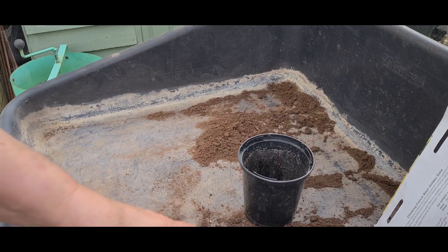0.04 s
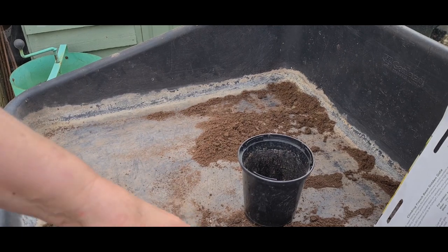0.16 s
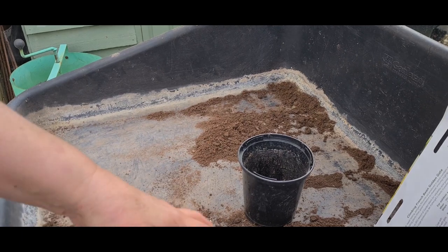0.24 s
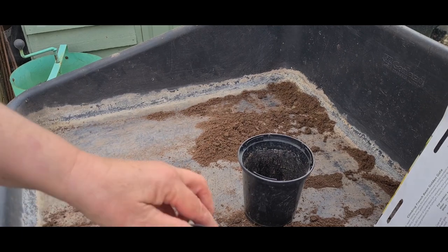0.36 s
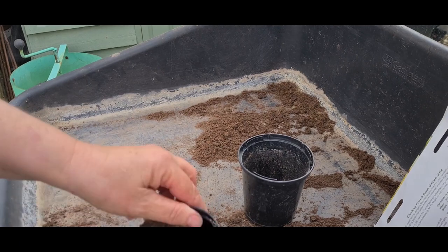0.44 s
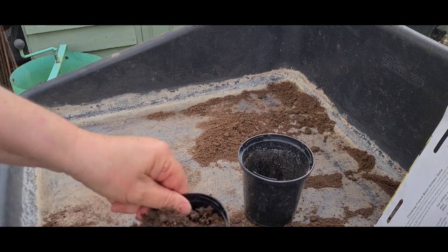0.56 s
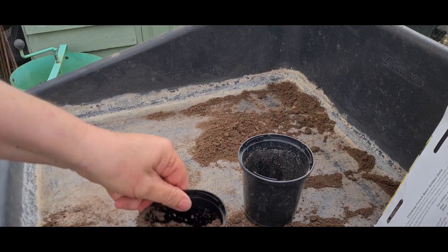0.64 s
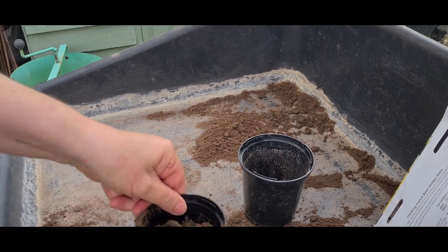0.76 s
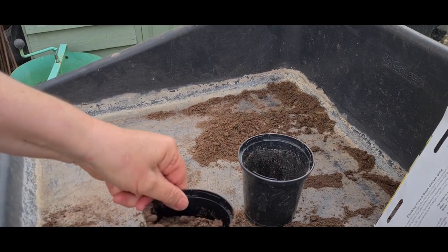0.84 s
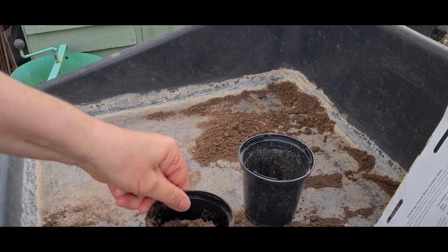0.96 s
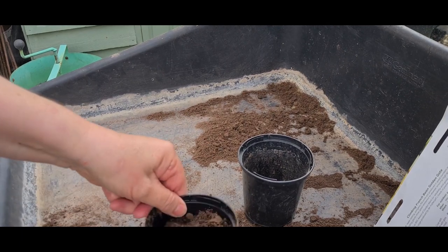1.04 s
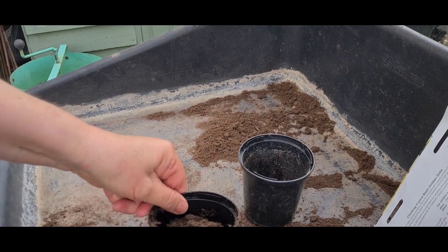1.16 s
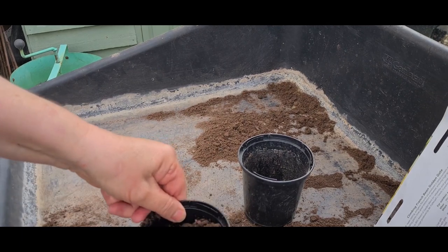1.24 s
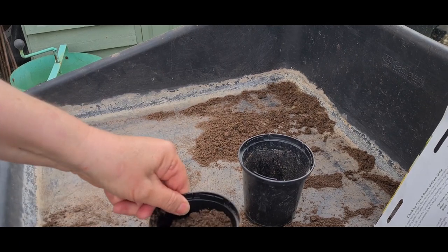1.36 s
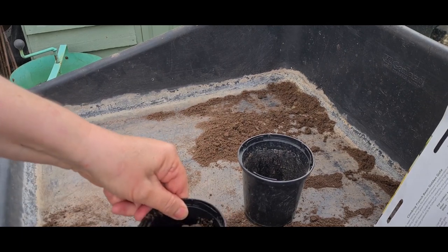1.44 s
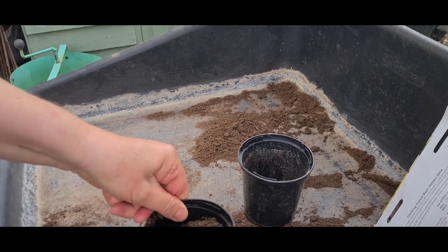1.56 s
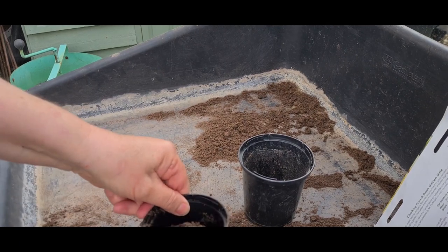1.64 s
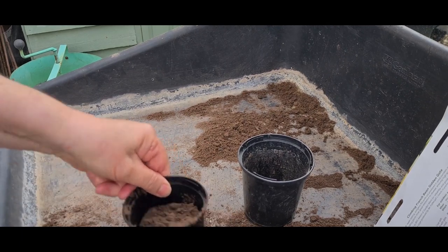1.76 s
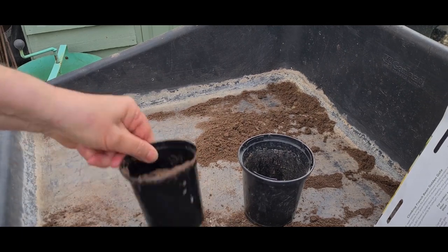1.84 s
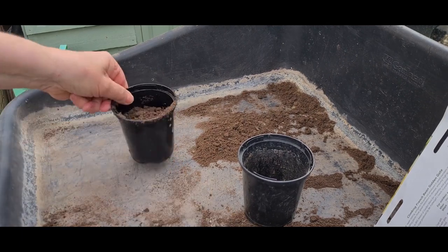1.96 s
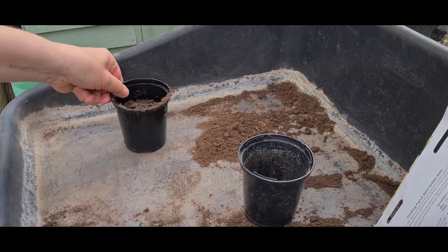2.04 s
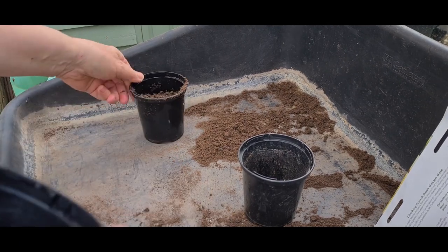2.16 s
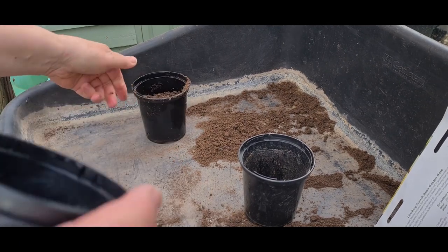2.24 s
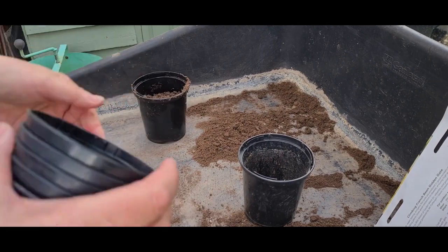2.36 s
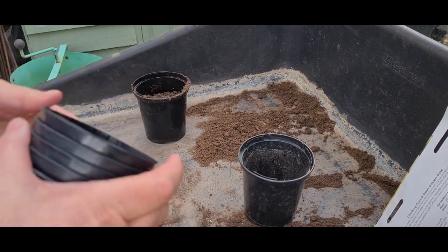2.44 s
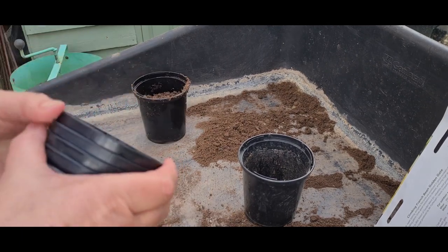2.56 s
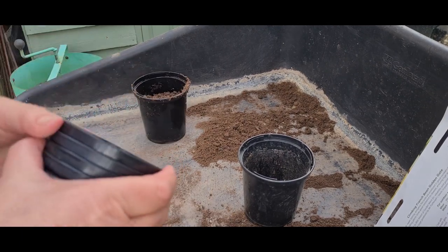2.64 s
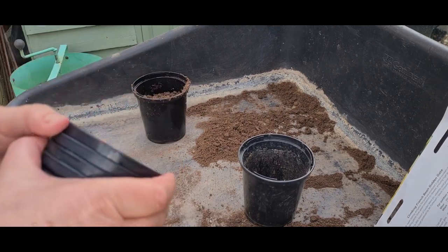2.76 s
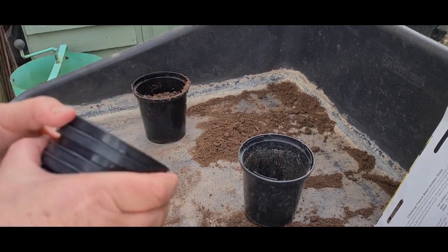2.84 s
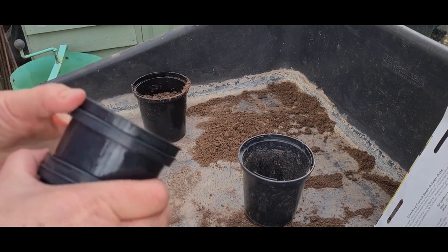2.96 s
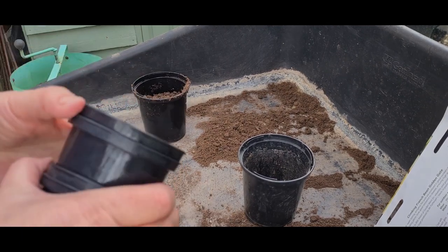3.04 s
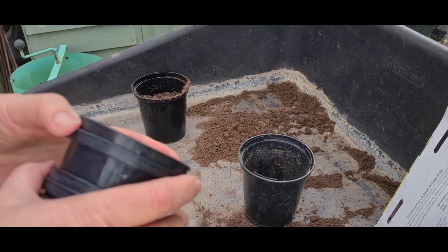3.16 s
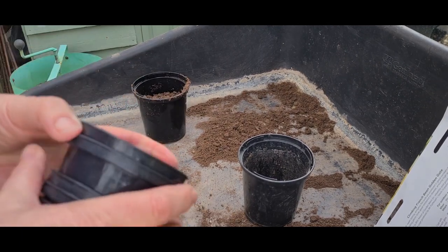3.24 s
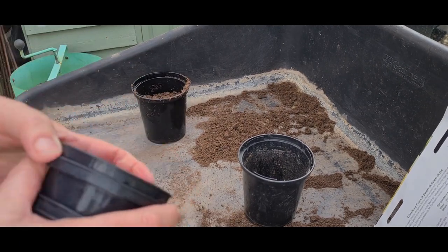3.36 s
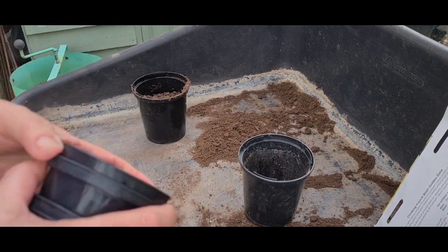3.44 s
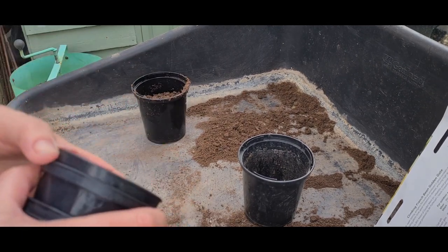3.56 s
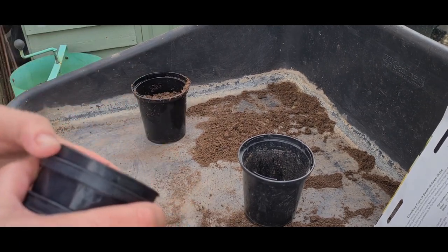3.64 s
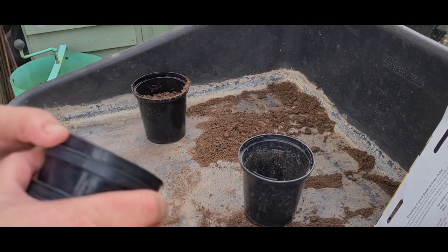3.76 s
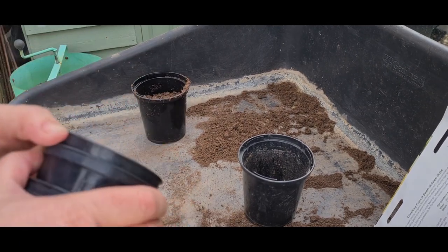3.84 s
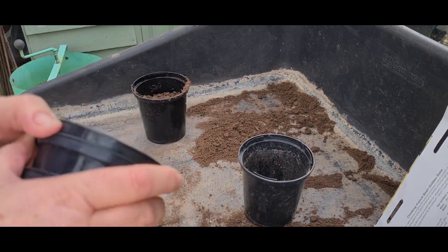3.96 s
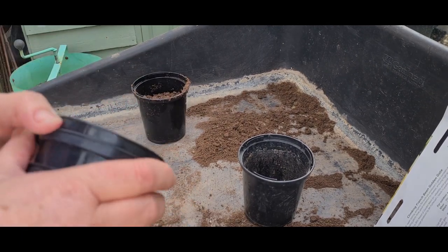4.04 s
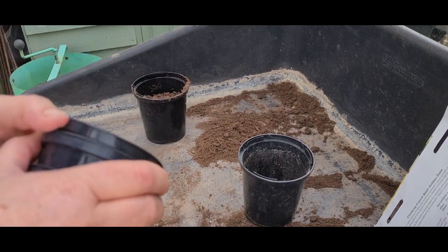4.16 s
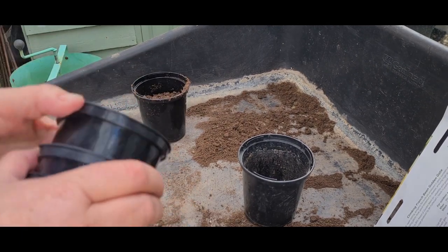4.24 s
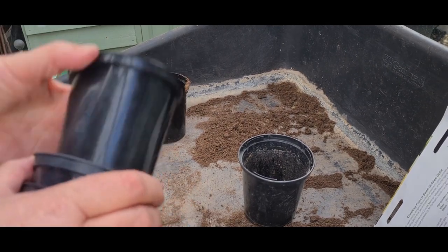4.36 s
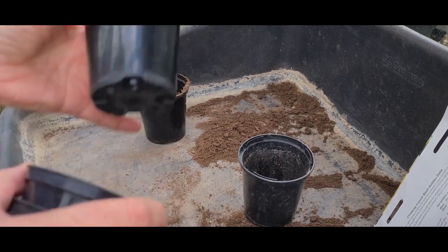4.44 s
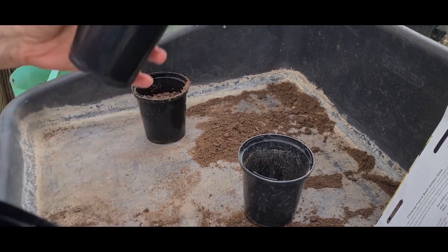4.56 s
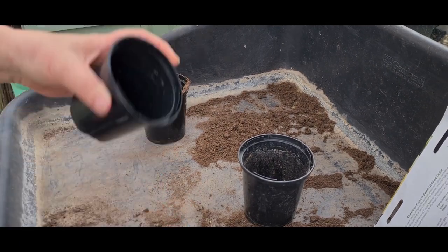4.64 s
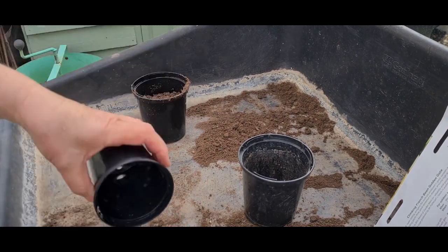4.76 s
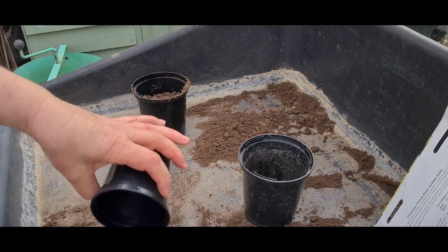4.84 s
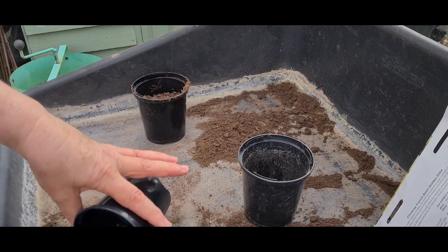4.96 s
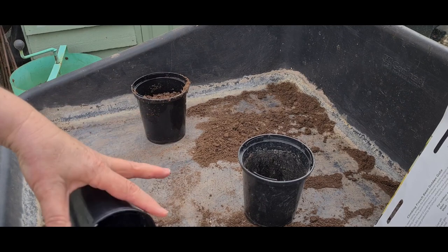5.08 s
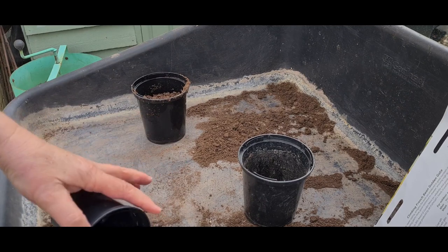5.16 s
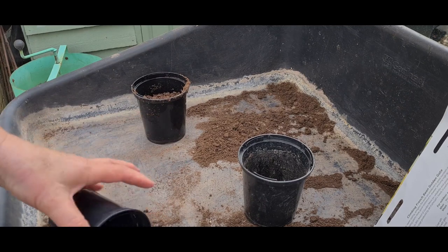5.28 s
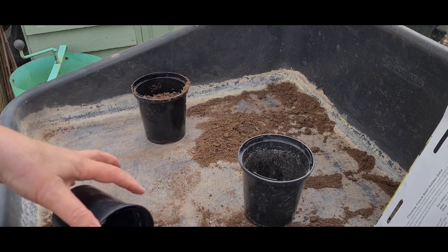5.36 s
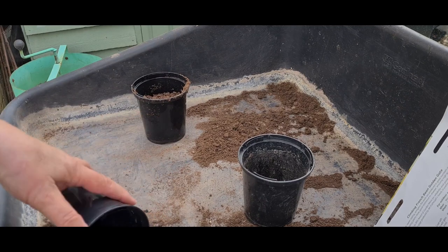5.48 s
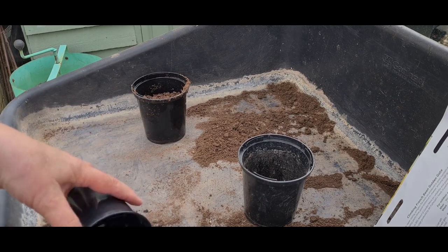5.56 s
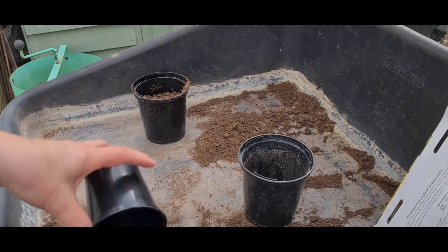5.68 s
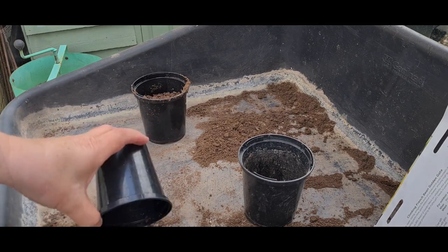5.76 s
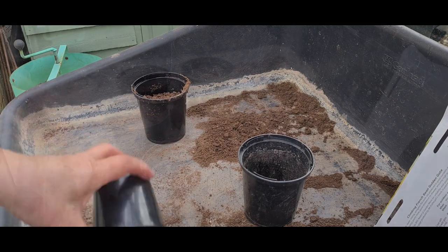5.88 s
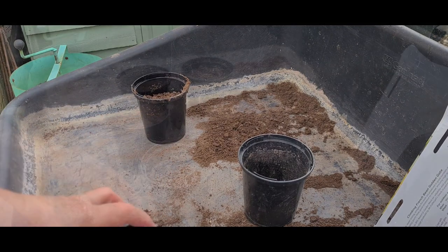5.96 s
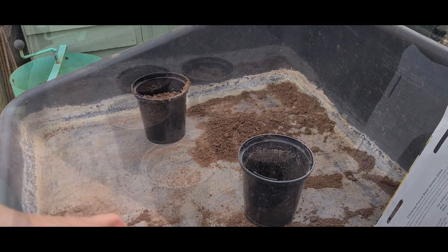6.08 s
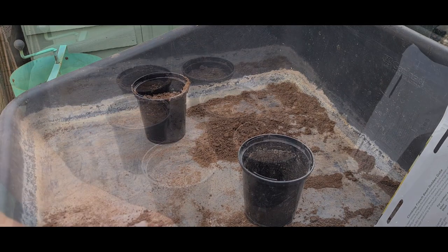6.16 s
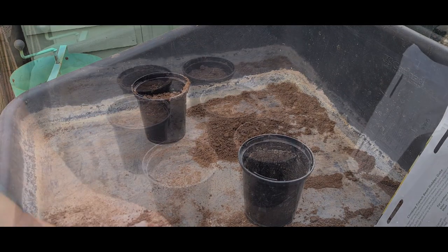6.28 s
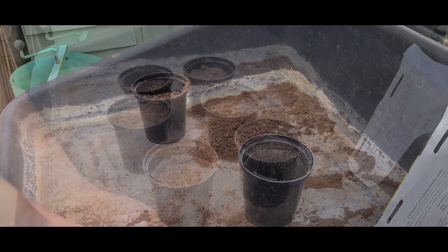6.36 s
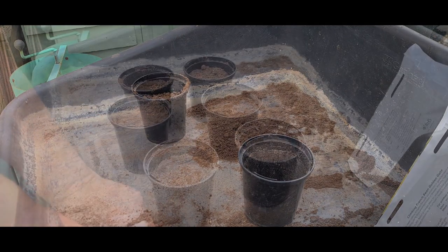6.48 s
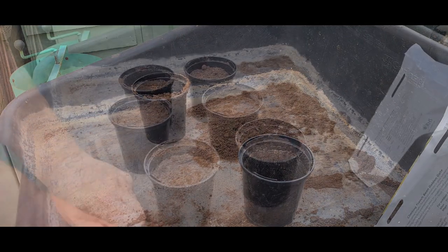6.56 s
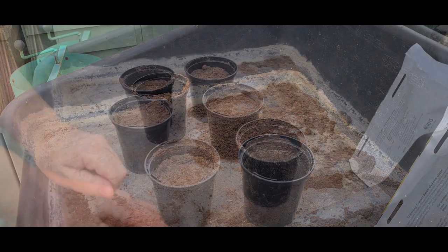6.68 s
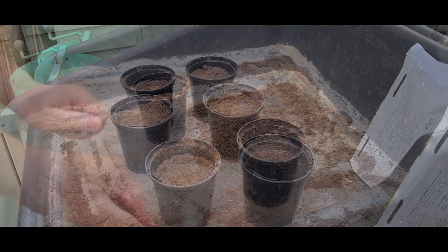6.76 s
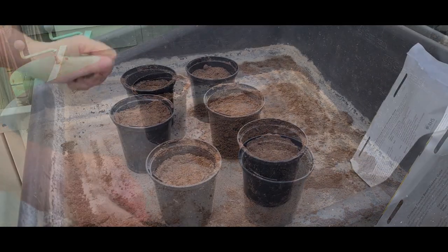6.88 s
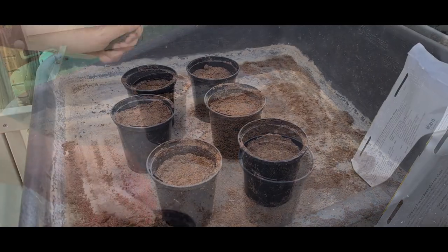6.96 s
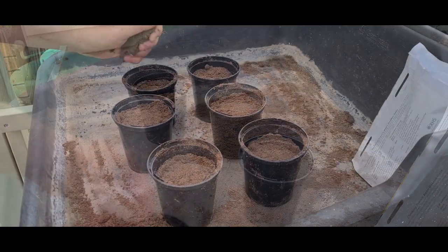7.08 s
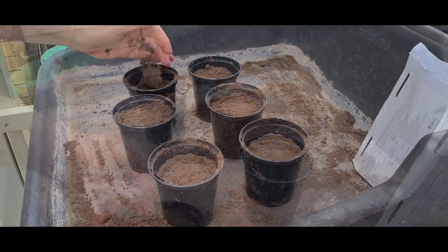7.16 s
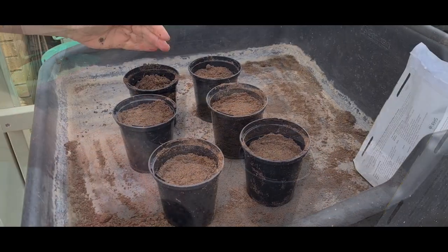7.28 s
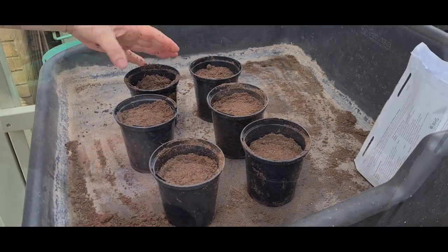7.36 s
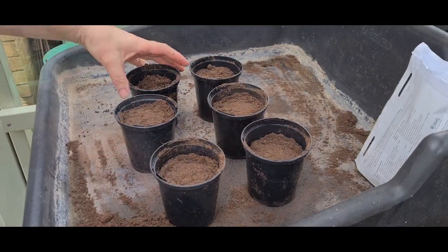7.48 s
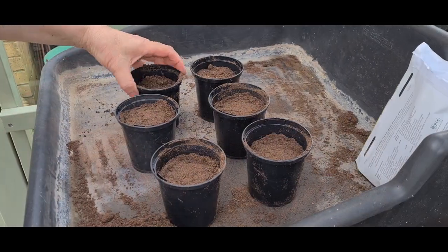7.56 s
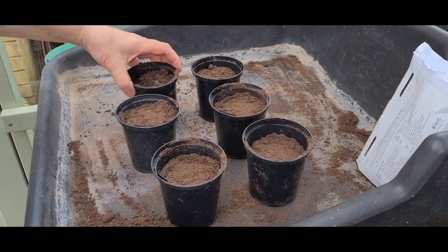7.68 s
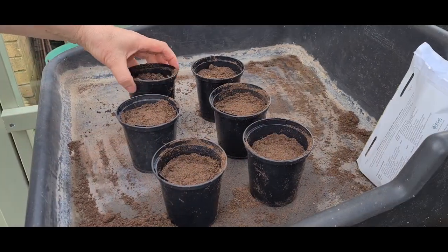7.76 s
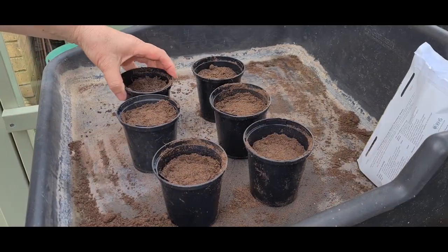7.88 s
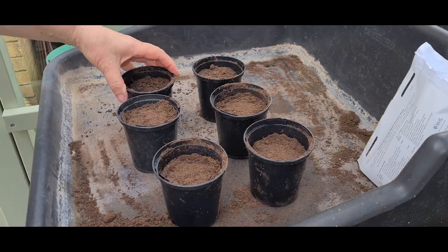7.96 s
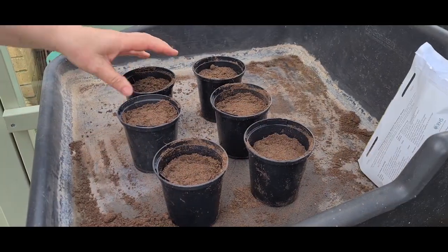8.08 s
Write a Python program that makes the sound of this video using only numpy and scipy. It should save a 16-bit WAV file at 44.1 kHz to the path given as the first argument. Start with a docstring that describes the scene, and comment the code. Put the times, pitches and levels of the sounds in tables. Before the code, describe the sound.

Gritty compost crunches as a filled plastic pot is shaken and set down, empty pots click apart, then one grinds through the heap outdoors.

```python
"""Outdoors, at a big plastic potting tray an arm's length away, small plastic pots are filled with gritty compost.
Scooping and pressing crush the grains: dense random clicks, shaped into strokes. Knocks are short blows with a chatter.
A filled pot is set down, a stack of empty pots is worked apart, and an empty pot is pushed through the heap.
Every contact is coloured by its material and made to ring like the tray or a pot, with echoes.
Behind it lie a low rumble and a hiss of filtered noise, and two faint rising whistles of fluttering tone."""
import sys
import numpy as np
from scipy import signal
from scipy.fft import rfft, irfft, next_fast_len
from scipy.io import wavfile
from scipy.ndimage import uniform_filter1d

SR = 44100
rng = np.random.default_rng(int(sys.argv[2]) if len(sys.argv) > 2 else 0)


def materialize(psi):
    """Save the field psi as 16-bit PCM at rate SR to the path in sys.argv[1].

    A 1-D psi becomes a single channel; in a 2-D psi each row is a channel.
    """
    bounded = np.clip(np.atleast_2d(psi).T, -1, 1)
    quanta = np.round(bounded * 32767).astype(np.int16)
    wavfile.write(sys.argv[1], SR, quanta)


N = 358212
T = np.arange(N) / SR
PORT_LAG = 6  # samples by which the right microphone port hears a contact later
TOP_HZ = 16100  # the recorder passes nothing much above this
AIR_DB = -73.5  # middle level of the hiss

# All levels in the tables of contacts are relative: ringing, echoes and roaming change them later.
# "Brightness" tilts a contact's balance by so many dB from each range to the next higher one.

# edges of the thud, body, grit and fizz ranges: (from [Hz], to [Hz])
BANDS = [(60, 330), (330, 2000), (2000, 8000), (8000, 16000)]
# outdoor hiss, its colour: (frequency [Hz], relative level [dB per Hz])
HISS_COLOUR = [(100, -57), (170, 0.5), (312, -3.5), (392, -0.5), (1800, -12), (2090, -14.5), (2440, -13.5),
               (2840, -12), (3120, -8.5), (16000, -28)]
# low rumble of the open air, before a common lift: (time [s], level [dB])
RUMBLE = [(0.0, -62), (0.59, -63.5), (0.93, -59), (4.09, -68), (5.25, -64), (5.67, -67), (5.99, -61.5),
          (6.87, -71), (7.4, -70), (8.12, -60)]
# colour of the rumble: (frequency [Hz], relative level [dB])
RUMBLE_COLOUR = [(12, -24.5), (22, -10.5), (30, -2.5), (44, -4), (66, -8), (82, -3.5), (96, -9), (150, -20),
                 (260, -31.5), (600, -81.5)]
# faint whistles: (start [s], length [s], from [Hz], to [Hz], level at the fullest point [dB])
WHISTLES = [(.28, 0.23, 1880, 2080, -74), (3.69, 0.27, 1880, 3340, -75.5)]
# what the tray rings with, give or take a little: (frequency [Hz], time to fall 60 dB [s], relative level [dB])
TRAY_MODES = [(112.7, 0.47, -1), (128.3, 0.16, -5), (226.7, 0.22, -3.5), (277, 0.028, -9.5),
              (386, 0.37, -14), (479.7, 0.1, -7.5), (576, 0.25, -8), (715, 0.23, -14), (805, 0.52, -19),
              (1124, .2, -19.5), (1306, 0.053, -13.5), (1449, 0.05, -8.5), (2030, 0.25, -11),
              (3250, .1, -6.5), (4680, 0.11, -17.5)]
# what an empty pot rings with, likewise: (frequency [Hz], time to fall 60 dB [s], relative level [dB])
POT_MODES = [(706, 0.085, 3), (1060, 0.068, -11), (1357, 0.21, 1.5), (1970, 0.15, 5.5), (2350, 0.13, -31),
             (3020, 0.071, 6), (3840, 0.066, 0), (4400, .08, -14), (6460, 0.047, -23)]
# colour of a grain in the tray: (frequency [Hz], relative level [dB])
TRAY_COLOUR = [(30, -0.5), (55, -3), (85, 3.5), (125, 4), (180, 1), (235, 2), (420, 1.5), (700, -0.5),
               (1400, -2.5), (2200, -5.5), (5200, -6), (7000, -9.5), (9500, -16.5), (13300, -9.5),
               (16000, -23.5)]
# colour of a pot's wall: (frequency [Hz], relative level [dB])
POT_COLOUR = [(300, -20), (700, 0.5), (1500, -5), (3000, 3), (5500, 2), (7000, 0.5), (9500, -12),
              (13300, -11.5), (16000, -22.5)]
# colour of the heap against the pot: (frequency [Hz], relative level [dB])
HEAP_COLOUR = [(47, -33), (80, -16), (166, -25), (225, -4.5), (314, -12.5), (693, 0), (965, -3), (1470, -5),
               (2720, -3.5), (4820, -2), (9130, -14), (13300, -8.5), (15500, -23.5)]
# loose compost is scooped or trickles: (start [s], length [s], level [dB], brightness [dB])
SCOOPS = [(-.01, 0.079, -27.5, -2.5), (.06, .06, -35, -4), (.19, 0.067, -49.5, -4), (.29, 0.32, -68, -1.5),
          (.47, 0.32, -57.5, 0), (6.6, 0.11, -63.5, -6.5), (6.83, 0.12, -58, 0.5),
          (7.41, 0.085, -56.5, -0.5)]
# a pot's base bumps the tray: (time [s], level [dB], brightness [dB])
BUMPS = [(.461, -45.5, -8.5), (.667, -35.5, -2.5), (1.668, -33, -0.5), (2.031, -26, -0.5),
         (5.291, -55.5, 1), (5.374, -42.5, 7), (5.495, -35.5, -2), (7.497, -46, 1.5)]
# the pot is jolted; its compost jumps and lands again: (time [s], jolt [dB], flight [s], landing [dB])
SHAKES = [(0.802, -36, 0.065, -42.5), (.98, -25, 0.058, -32.5), (1.125, -35.5, 0.095, -37.5),
          (1.31, -34, 0.046, -38.5), (1.377, -39, 0.078, -37.5), (1.547, -47, 0.027, -43.5)]
# coarse grit cracks under a rim: (time [s], level [dB], brightness [dB])
CRACKS = [(.549, -51.5, -11), (.667, -38, -5.5), (4.946, -42.5, 5.5), (4.988, -45, 3), (5.054, -47.5, 0.5),
          (5.104, -53, 0), (5.447, -54, 3.5), (5.649, -37.5, 1.5), (5.871, -30.5, 3), (6.062, -37.5, 6),
          (6.176, -27, -4.5), (6.345, -35, -6.5)]
# a full pot is dragged over the gritty floor: (start [s], length [s], level [dB], brightness [dB])
DRAGS = [(2.055, 0.047, -35.5, -2.5), (2.11, 0.1, -39.5, 4.5), (2.155, 0.054, -41, -5),
         (7.495, 0.088, -43, -3.5), (7.575, 0.11, -40, 4), (7.665, .075, -32, 1), (7.75, 0.1, -41, 2.5),
         (7.82, 0.071, -32.5, 1.5), (7.89, 0.099, -43.5, -2), (7.98, 0.046, -54.5, -15)]
# an empty pot is rocked and turned on the floor: (start [s], length [s], level [dB], brightness [dB])
SCUFFS = [(4.902, 0.11, -44.5, -1), (4.93, 0.032, -48, 5), (4.98, 0.067, -48.5, -1.5),
          (5.1, 0.06, -47.5, 1), (5.19, 0.045, -43, 1.5), (5.36, .11, -50.5, -3), (5.48, 0.046, -43, -2)]
# a pot is pushed through the heap, one list per shove: (time [s], treble level [dB], body level [dB])
SHOVES = [
    [(5.52, -49, -46), (5.57, -38, -47), (5.588, -53.5, -57), (5.636, -46, -49), (5.688, -32.5, -40.5),
     (5.74, -31.5, -43.5), (5.79, -60, -63)],
    [(5.8, -43, -39), (5.818, -32, -31.5), (5.858, -26.5, -41), (5.868, -28, -32.5), (5.9, -47, -52)],
    [(5.91, -41.5, -44), (5.948, -31, -36), (5.978, -34, -35.5), (6.032, -45, -40.5), (6.06, -46, -34),
     (6.132, -52, -44.5), (6.165, -44, -39.5)],
    [(6.2, -46.5, -44), (6.274, -51, -51), (6.32, -52, -48.5), (6.336, -49.5, -38.5), (6.404, -42, -34),
     (6.49, -70, -65.5), (6.58, -81, -58)],
]
# fingers pat the filling down: (time [s], level [dB], brightness [dB])
PATS = [(6.771, -49, -0.5), (6.946, -52, 2.5), (7.095, -46.5, 2), (7.262, -52, -1.5)]
# pot rims catch and snap free: (time [s], wall resonance [Hz], level [dB], brightness [dB])
TICKS = [(1.891, 3100, -64, 3), (2.488, 3660, -58, 5), (2.553, 495, -55.5, -3), (2.925, 990, -59, -14),
         (2.993, 3530, -62, 16), (3.048, 3550, -60, 15), (3.088, 750, -66, -15), (3.12, 3100, -56.5, 8),
         (3.455, 1850, -60, -8), (3.518, 3100, -65, -2), (3.603, 500, -58, 1), (3.911, 3220, -49, -6),
         (4.079, 2180, -43.5, 1.5), (4.185, 2900, -41.5, -6), (4.317, 700, -46, -6), (4.441, 3220, -46, -3),
         (4.508, 2360, -45, -1)]
# fingers and nested pots rub on each other: (start [s], length [s], level [dB], brightness [dB])
RUBS = [(2.55, 0.073, -68, 2), (2.8, .1, -52, -1), (2.87, 0.077, -56, 3), (3.06, 0.058, -62.5, 0),
        (3.135, 0.028, -51, 2.5), (3.23, 0.058, -46.5, 1), (3.29, 0.14, -66, -7), (3.385, 0.037, -51, 4),
        (3.635, 0.028, -58.5, -1.5), (3.915, 0.047, -59, -1.5), (4.69, 0.114, -64, 3.5)]
# a pot slips out of the stack and its cavity sounds: (start [s], length [s], level [dB], brightness [dB])
PULLS = [(4.178, 0.079, -42.5, 5), (4.2, 0.056, -39, -5.5), (4.31, 0.029, -46.5, -4.5)]

# Each kind of contact has one hollow resonance [Hz] and one balance of thud, body, grit and fizz [dB].
LOOSE_HZ, LOOSE_DB = 464, [-16.5, -1, 1, -12]
BUMP_HZ, BUMP_DB = 238, [1, -5.5, -10.5, -17.5]
JOLT_HZ, JOLT_DB = 466, [-8.5, -2.5, 2.5, -16]
LANDING_S, LANDING_HZ, LANDING_DB = 0.049, 875, [-15, -0.5, -1.5, -16]
CRACK_HZ, CRACK_DB = 1360, [-19.5, -3.5, 0.5, -5.5]
DRAG_HZ, DRAG_DB = 1500, [-4, -0.5, -3.5, -14.5]
SCUFF_HZ, SCUFF_DB = 505, [2.5, 0, 1, -7.5]
PAT_S, PAT_HZ, PAT_DB = 0.069, 444, [-2.5, 1, -2, -14.5]
# pots in the hands have a balance of body, grit and fizz only; each tick has its own resonance
TICK_DB = [-7.5, -2.5, -13]
RUB_HZ, RUB_DB = 3300, [-8, -0.5, -8.5]
PULL_HZ, PULL_DB = 693, [-1.5, 2.5, -5.5]
# every jolt rattles the grains alike
RATTLE_S, RATTLE_DB = 0.062, -38.5
# crumbs settle with each bump, this long [s] and at this level against it [dB]
SETTLE_S, SETTLE_DB = 0.038, -11.5
# the crunch under the fingers, against the pat [dB]
YIELD_DB = -1


def undb(db):
    """Decibels to gain."""
    return 10 ** (np.asarray(db) / 20)


def unit(x):
    """Scale to an average strength (rms) of 1."""
    return x / np.sqrt(np.mean(x ** 2))


def fade(t, t60):
    """Exponential decay, 60 dB down after t60 seconds."""
    return np.exp(-np.log(1000) * t / t60)


def walk(rate, count=N):
    """Smooth random wander with a spread of about 1, taking a new step so many times a second."""
    hold = max(int(SR / rate), 2)
    steps = np.repeat(rng.standard_normal(count // hold + 2), hold)
    return unit(uniform_filter1d(steps, hold))[:count]


def colour(x, points):
    """Filter through (Hz, dB) points in such a way that nothing sounds before its cause."""
    size = 2 * next_fast_len(x.shape[-1])
    hz, db = np.transpose(points)
    log_hz = np.log(np.fft.rfftfreq(size, 1 / SR) + 1)
    log_gain = np.log(undb(np.interp(log_hz, np.log(hz), db)))
    # folding the cepstrum onto positive time makes the filter minimum phase
    cepstrum = irfft(log_gain)
    cepstrum[1:size // 2] *= 2
    cepstrum[size // 2 + 1:] = 0
    return irfft(rfft(x, size) * np.exp(rfft(cepstrum)))[..., :x.shape[-1]]


def diffuse(count, apart_hz):
    """Stereo noise: alike at both ports in the bass, increasingly unrelated above apart_hz."""
    mid, side = rng.standard_normal((2, count))
    side = signal.sosfilt(signal.butter(1, apart_hz, "high", fs=SR, output="sos"), side)
    return np.array([mid + side, mid - side])


def add(track, start, x):
    """Mix x into the track at a time in seconds."""
    a = max(int(start * SR), 0)
    track[a:a + len(x)] += x[:len(track) - a]


def grains(rate, spread_db, clump_db, clump_rate):
    """Tiny fractures and slips: random clicks per second, of unequal size, which may come in clumps."""
    happens = rng.random(N) < rate / SR
    sizes = undb(spread_db * np.minimum(rng.exponential(size=N), 4))
    signs = rng.choice([-1, 1], N)
    return unit(happens * sizes * signs * undb(clump_db * walk(clump_rate)))


def voice(db, bright_db, hollow_hz, range_db):
    """Resonance and range levels of one contact; a harder one tilts towards the treble."""
    steps = np.arange(len(range_db))
    return hollow_hz, *(db + np.array(range_db) + bright_db * (steps - steps.mean()))


def sweeps(rows, hollow_hz, range_db, rise_share):
    """Strokes of one kind: each swells for a share of its length and falls over the rest."""
    return [(start, rise_share * length, (1 - rise_share) * length, *voice(db, bright, hollow_hz, range_db))
            for start, length, db, bright in rows]


def hits(rows, hollow_hz, range_db):
    """Blows of one kind."""
    return [(start, *voice(db, bright, hollow_hz, range_db)) for start, db, bright in rows]


def tint(x, hollow_hz, band_db, points, hollow_db, hollow_width):
    """Colour of one contact: the material, a resonance set by grip and filling, and each range's strength."""
    hz = np.geomspace(30, 18000, 140)
    base_hz, base_db = np.transpose(points)
    material_db = np.interp(np.log(hz), np.log(base_hz), base_db)
    db = material_db + hollow_db / (1 + (np.log(hz / hollow_hz) / hollow_width) ** 2)
    # three levels leave out the thud range
    bands = BANDS[-len(band_db):]
    power = undb(db) ** 2 * np.gradient(hz) / (SR / 2)
    own_db = [10 * np.log10(power[(hz >= lo) & (hz < hi)].sum()) for lo, hi in bands]
    db = db + np.interp(np.log(hz), np.log(bands).mean(axis=1), np.subtract(band_db, own_db))
    return colour(np.pad(x, (0, SR // 20)), np.column_stack([hz, db]))


def strokes(table, grit, fall_db, points, hollow_db, hollow_width):
    """Rubbing force lets grit through: every stroke swells, then dies away by fall_db over its fall time."""
    out = np.zeros(N)
    for start, rise, fall, hollow_hz, *band_db in table:
        a, b = np.searchsorted(T, [start, start + rise + 3 * fall])
        t = T[a:b] - start
        swell = np.minimum(t / rise, 1) ** 0.3
        force = swell * undb(-fall_db * (np.maximum(t - rise, 0) / fall) ** 1.04)
        add(out, start, tint(grit[a:b] * force, hollow_hz, band_db, points, hollow_db, hollow_width))
    return out


def blows(table, crumble, crumble_t60, onset_db, gain_db, points, hollow_db, hollow_width):
    """A 10 ms noise ramp softens the onset, then come the contact itself and a short chatter."""
    out = np.zeros(N)
    lead = SR // 100
    t = np.arange(SR // 20) / SR
    for start, hollow_hz, *band_db in table:
        # cubed noise is spiky
        chatter = rng.standard_normal(len(t)) ** 3 * fade(t, crumble_t60)
        push = crumble * chatter / np.linalg.norm(chatter)
        push[0] = 1
        push /= np.linalg.norm(push)
        onset = rng.standard_normal(lead) * np.linspace(0, 1, lead) ** 2
        onset *= undb(onset_db) / np.linalg.norm(onset)
        blow = tint(np.concatenate([onset, push]), hollow_hz, band_db, points, hollow_db, hollow_width)
        add(out, start - lead / SR, undb(gain_db) * blow)
    return out


def response(modes, ring_db, walls_db, walls_t60, yard_db, yard_t60):
    """One spot of contact as the ports hear it: crack, ringing modes, echoes inside the tray and off the yard."""
    t = np.arange(SR // 2) / SR
    direct = np.zeros(len(t))
    direct[0] = 1
    for hz, t60, db in modes:
        spot_hz = hz * (1 + 0.0091 * rng.standard_normal())
        ring = np.sin(2 * np.pi * spot_hz * t) * fade(t, t60)
        strength = rng.standard_normal() * undb(db + ring_db) * np.sqrt(hz / SR)
        direct += strength * ring / np.linalg.norm(ring)
    # the hands work on the left, so the right port hears them later
    out = np.array([direct, np.pad(direct, (PORT_LAG, 0))[:len(t)]])
    for db, t60 in ((walls_db, walls_t60), (yard_db, yard_t60)):
        # echoes build up quickly, then decay
        echoes = diffuse(len(t), 570) * fade(t, t60) * (1 - fade(t, t60 / 20))
        out += undb(db) * echoes / np.linalg.norm(echoes[0])
    # each spot gets a random polarity
    return rng.choice([-1, 1]) * out / np.linalg.norm(out[0])


def radiate(contact, spots, roam_rate, roam_db):
    """The contact roams over several spots, so its ring and echoes keep changing."""
    shares = np.array([undb(roam_db * walk(roam_rate)) for _ in spots])
    shares /= np.linalg.norm(shares, axis=0)
    out = np.zeros((2, N))
    for share, spot in zip(shares, spots):
        out += signal.oaconvolve((contact * share)[None], spot, axes=1)[:, :N]
    return out


def air():
    """A restless low rumble under a thin, nearly even hiss, both made of filtered noise."""
    hiss = unit(colour(diffuse(N, 550), HISS_COLOUR)) * undb(AIR_DB + 1.8 * walk(1.9))
    rumble = unit(colour(diffuse(N, 500), RUMBLE_COLOUR))
    rumble_db = np.interp(T, *np.transpose(RUMBLE)) + 4.5
    return hiss + rumble * undb(rumble_db)


def compost():
    """Grains crunch against pot and tray, and knocks drum the tray's floor."""
    grit = grains(rate=3000, spread_db=5.5, clump_db=2, clump_rate=200)
    crunch = strokes(crunches(), grit, fall_db=13.5, points=TRAY_COLOUR, hollow_db=6.5, hollow_width=0.15)
    knocks = blows(impacts(), crumble=0.92, crumble_t60=0.017, onset_db=-14, gain_db=25.5,
                   points=TRAY_COLOUR, hollow_db=7.5, hollow_width=0.21)
    dig = digging(split_hz=1810, treble_db=2.0, body_db=3.0)
    spots = [response(TRAY_MODES, ring_db=5.0, walls_db=3, walls_t60=0.04, yard_db=0.0, yard_t60=0.27)
             for _ in range(8)]
    return radiate(crunch + knocks + dig, spots, roam_rate=22, roam_db=9.5)


def crunches():
    """All strokes that move grains: scoops, sliding pots, and what goes with each jolt, bump and pat."""
    rattles = [(s, RATTLE_S, RATTLE_DB, 0) for s, *_ in SHAKES]
    landings = [(s + flight, LANDING_S, db, 0) for s, _, flight, db in SHAKES]
    settling = [(s, SETTLE_S, db + SETTLE_DB, bright) for s, db, bright in BUMPS]
    yielding = [(s, PAT_S, db + YIELD_DB, bright) for s, db, bright in PATS]
    return (sweeps(SCOOPS, LOOSE_HZ, LOOSE_DB, rise_share=0.45)
            + sweeps(rattles + settling, LOOSE_HZ, LOOSE_DB, rise_share=0.24)
            + sweeps(landings, LANDING_HZ, LANDING_DB, rise_share=0.39)
            + sweeps(yielding, PAT_HZ, PAT_DB, rise_share=0.21)
            + sweeps(DRAGS, DRAG_HZ, DRAG_DB, rise_share=0.52)
            + sweeps(SCUFFS, SCUFF_HZ, SCUFF_DB, rise_share=0.24))


def whistles():
    """Thin far-off glides with a fluttering, blurred pitch, which flatten slightly as they rise."""
    out = np.zeros(N)
    for start, length, from_hz, to_hz, db in WHISTLES:
        along = np.clip((T - start) / length, 0, 1)
        hz = from_hz + (to_hz - from_hz) * along ** 0.96
        phase = 2 * np.pi * np.cumsum(hz) / SR
        # two wandering strengths blur the pitch
        tone = walk(260) * np.sin(phase) + walk(260) * np.cos(phase)
        swell = 2 * np.sqrt(along * (1 - along))
        out += undb(db) * swell * tone
    return out


def impacts():
    """All that strikes the tray: jolts, bumps, cracking grit and pats."""
    jolts = [(s, db, 0) for s, db, *_ in SHAKES]
    return (hits(jolts, JOLT_HZ, JOLT_DB) + hits(BUMPS, BUMP_HZ, BUMP_DB)
            + hits(CRACKS, CRACK_HZ, CRACK_DB) + hits(PATS, PAT_HZ, PAT_DB))


def empty_pots():
    """Thin walls stick and slip, and rims click; held in the air, they get no thud of their own."""
    slips = grains(rate=3500, spread_db=2.0, clump_db=0.0, clump_rate=200)
    crackle = grains(rate=1500, spread_db=-0.5, clump_db=4.0, clump_rate=150)
    pulls = strokes(sweeps(PULLS, PULL_HZ, PULL_DB, rise_share=0.5), slips, fall_db=14.5,
                    points=POT_COLOUR, hollow_db=9.5, hollow_width=0.051)
    rubs = strokes(sweeps(RUBS, RUB_HZ, RUB_DB, rise_share=0.85), crackle, fall_db=23,
                   points=POT_COLOUR, hollow_db=4.5, hollow_width=0.23)
    snaps = [(s, *voice(db, bright, wall_hz, TICK_DB)) for s, wall_hz, db, bright in TICKS]
    ticks = blows(snaps, crumble=0.66, crumble_t60=0.017, onset_db=-11.5, gain_db=26.0,
                  points=POT_COLOUR, hollow_db=10, hollow_width=0.064)
    spots = [response(POT_MODES, ring_db=2, walls_db=12.5, walls_t60=0.02, yard_db=8.5, yard_t60=0.25)
             for _ in range(6)]
    return radiate(pulls + rubs + ticks, spots, roam_rate=18, roam_db=9.0)


def digging(split_hz, treble_db, body_db):
    """The rim grinds through the heap: bright on the bare floor, duller as the pot fills."""
    grind = colour(grains(rate=4000, spread_db=3.5, clump_db=2.5, clump_rate=200), HEAP_COLOUR)
    times, treble, body = np.vstack(SHOVES).T
    out = np.zeros(N)
    for side, db in (("high", treble + treble_db), ("low", body + body_db)):
        part = unit(signal.sosfilt(signal.butter(3, split_hz, side, fs=SR, output="sos"), grind))
        # silent before the first shove and after the last
        out += part * undb(np.interp(T, times, db, left=-np.inf, right=-np.inf))
    return out


def scene():
    """The work in the tray, the pots in the hands and the open air."""
    return compost() + empty_pots() + whistles() + air()


def record(dry):
    """The right port is a little brighter than the left; the recorder cuts the top."""
    left = colour(dry[0], [(120, -1.2), (350, 0.47), (1400, -1.4), (3000, -1.3), (14000, 1.0)])
    right = colour(dry[1], [(120, -0.2), (350, -0.25), (1400, -1.46), (3000, 1.44), (14000, 4.0)])
    top_cut = signal.ellip(10, .2, 70, TOP_HZ, fs=SR, output="sos")
    return signal.sosfilt(top_cut, np.array([left, right]))


dry = scene()
out = record(dry)
materialize(out)
```